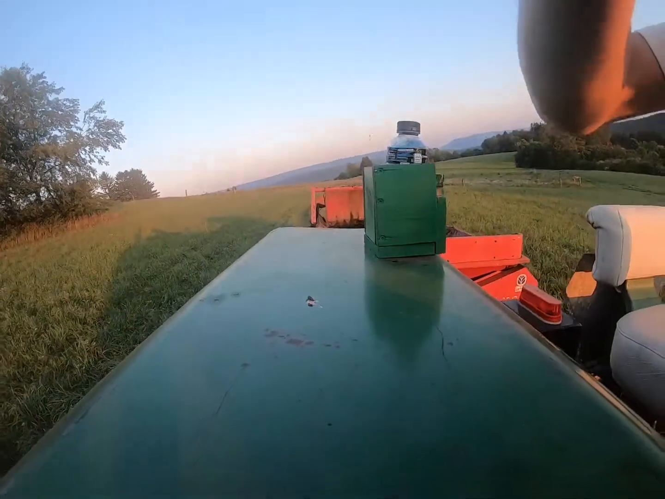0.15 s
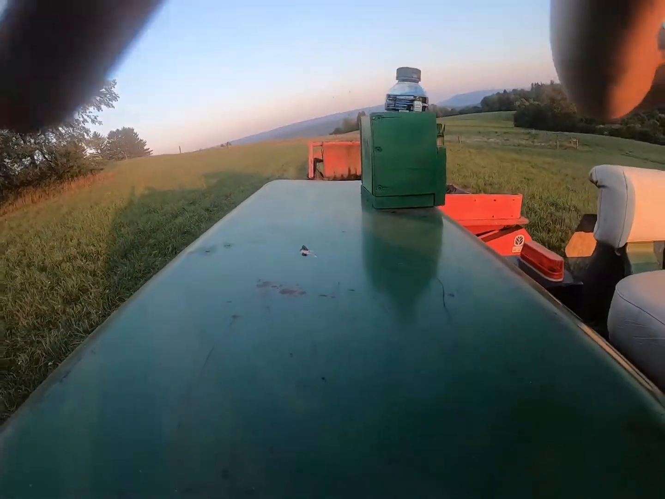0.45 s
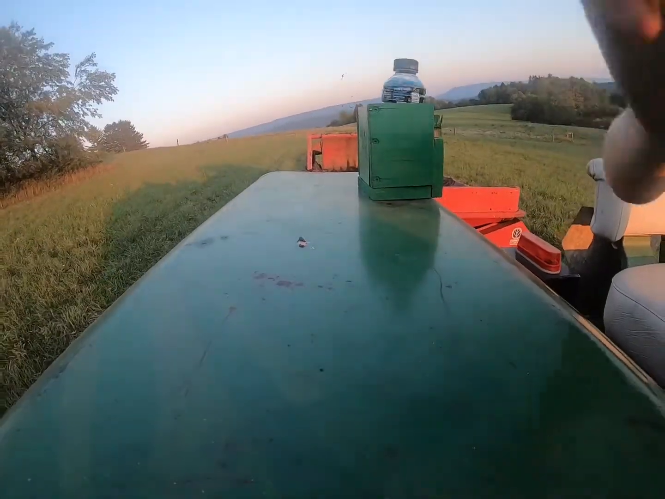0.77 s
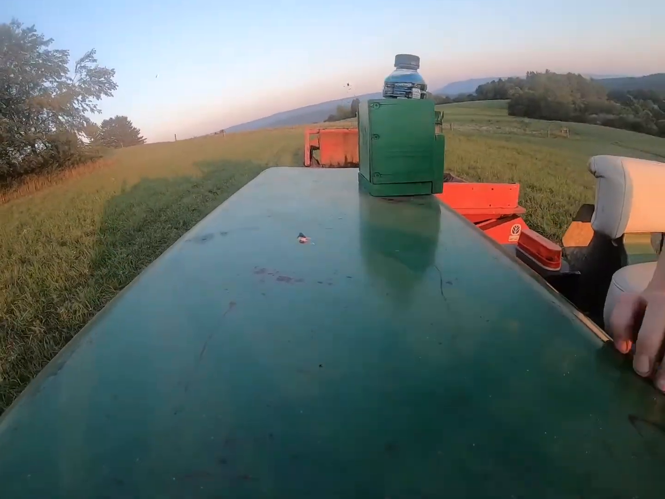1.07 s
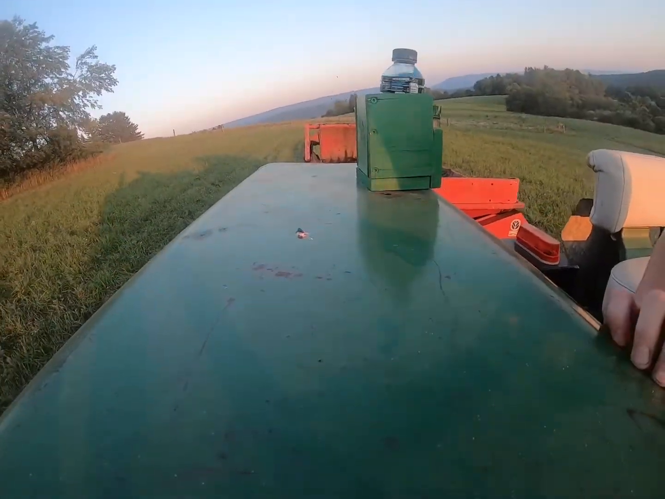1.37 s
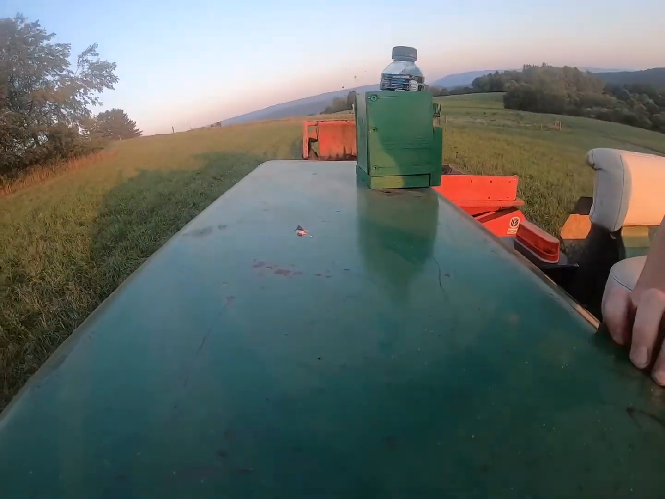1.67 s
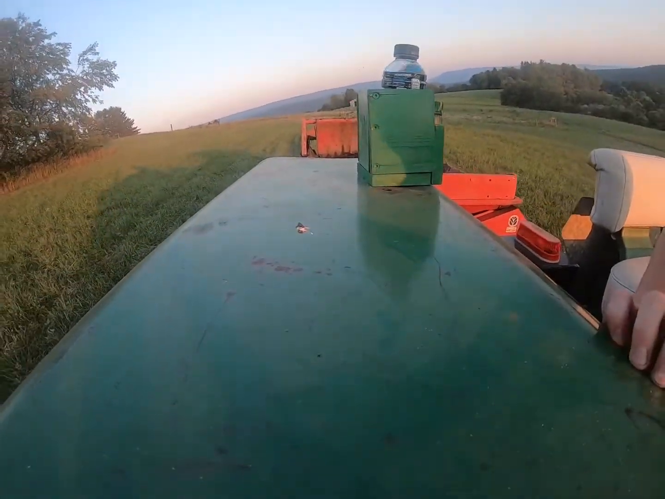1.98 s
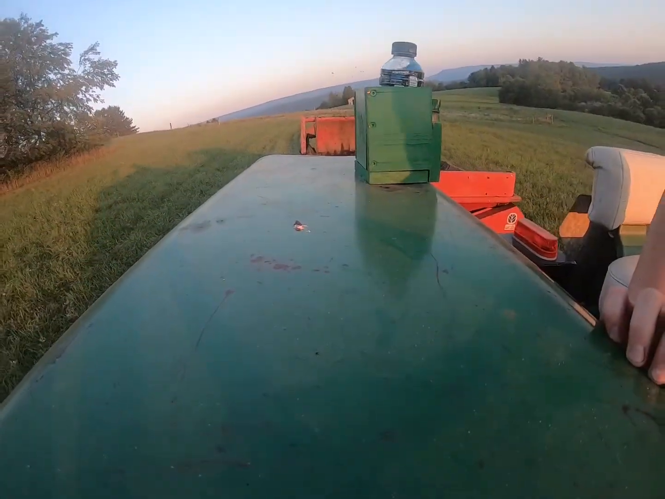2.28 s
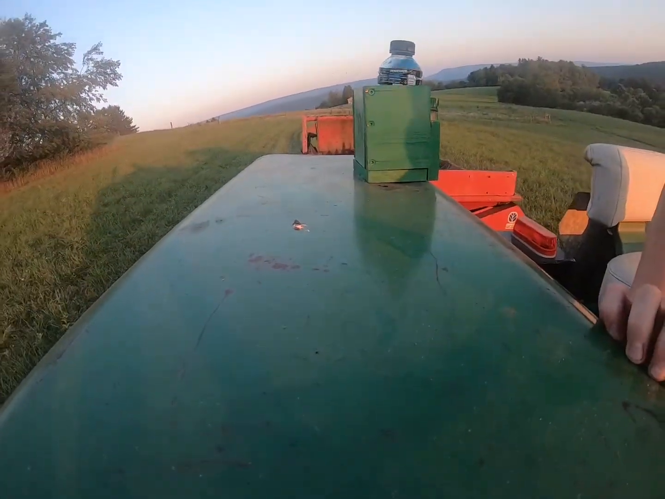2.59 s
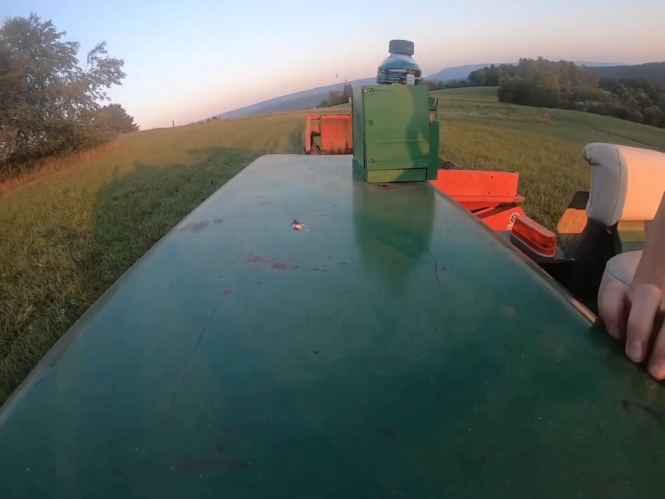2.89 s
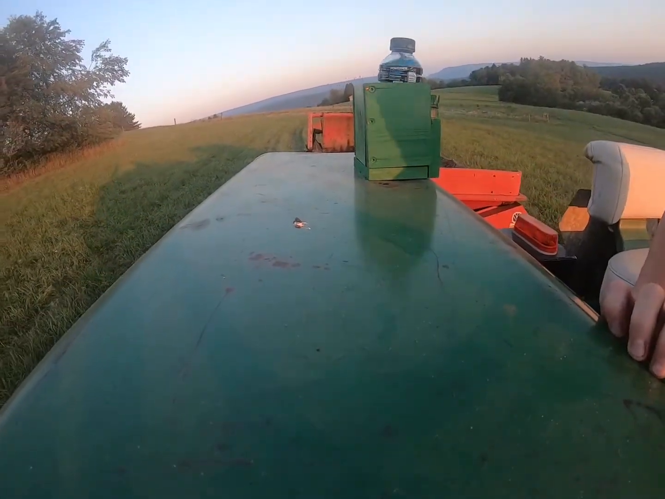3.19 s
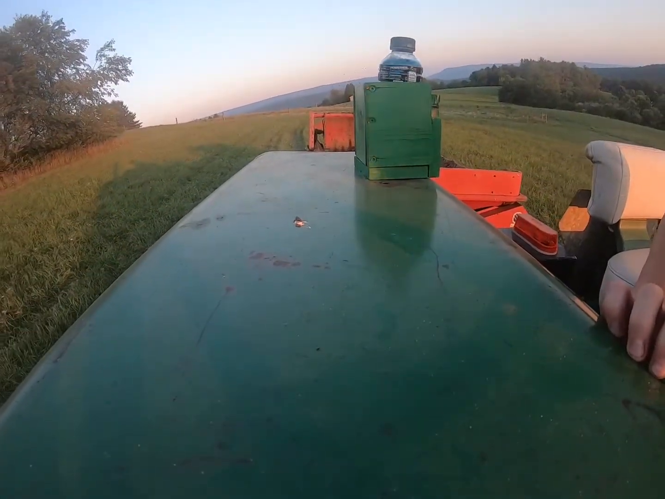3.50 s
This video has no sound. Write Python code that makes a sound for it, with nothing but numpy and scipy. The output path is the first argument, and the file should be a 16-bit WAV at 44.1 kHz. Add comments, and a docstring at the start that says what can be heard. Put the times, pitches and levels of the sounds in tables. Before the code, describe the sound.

A diesel tractor engine drones at steady revs, low booming exhaust with buzzing mechanical roar.

```python
"""Diesel tractor at work

A diesel tractor works a field at steady revs, heard in stereo from its bodywork.
The exhaust booms at the firing rate, block and panels buzz at multiples of the engine cycle, and a fan hums.
Coloured noise makes a broad mechanical roar, brighter on the right, where the engine is.
Extra hiss and a low gust fade out early; two small taps and a brief rasp come within the first second."""
import sys
import numpy as np
from scipy import signal
from scipy.fft import rfft, irfft, next_fast_len
from scipy.io import wavfile

SR = 44100
rng = np.random.default_rng(int(sys.argv[2]) if len(sys.argv) > 2 else 0)


def materialize(psi):
    """Save the field psi as 16-bit PCM at rate SR to the path in sys.argv[1].

    A 1-D psi becomes a single channel; in a 2-D psi each row is a channel.
    """
    bounded = np.clip(np.atleast_2d(psi).T, -1, 1)
    quanta = np.round(bounded * 32767).astype(np.int16)
    wavfile.write(sys.argv[1], SR, quanta)


N = 160965


def from_db(db):
    """Turn decibels into a plain multiplier."""
    return 10 ** (np.asarray(db) / 20)


def rms_one(x):
    """Scale a signal to an RMS of 1."""
    return x / np.sqrt(np.mean(x ** 2) + 1e-20)


def drift(rate_hz):
    """Slow random wandering with spread 1: noise smoothed twice, made once per 64 samples."""
    r = np.exp(-128 * np.pi * rate_hz / SR)
    noise = rng.standard_normal(N // 64 + 1002)
    slow = signal.lfilter([1], [1, -2 * r, r * r], noise)[1000:]  # drop the filter's start-up
    return np.interp(np.arange(N) / 64, np.arange(len(slow)), rms_one(slow - slow.mean()))


def noise_band(low_hz, high_hz):
    """Noise between two pitches, with an RMS of 1."""
    sos = signal.butter(3, [low_hz, high_hz], "band", fs=SR, output="sos")
    return rms_one(signal.sosfilt(sos, rng.standard_normal(N)))


# Engine speed, one cycle being two crank turns: (time [s], cycle rate [Hz])
CYCLE_RATE = [(0, 13.18), (.1, 13.17), (.35, 13.29), (.68, 13.115), (.95, 13.235), (1.15, 13.185),
              (1.35, 13.245), (1.9, 13.28), (2.2, 13.23), (2.6, 13.265), (2.73, 13.3), (3.0, 13.185),
              (3.1, 13.19), (3.4, 13.24), (3.65, 13.215)]
START_PLACE = .962  # place in the cycle at the start, 0-1


def cycle_angle():
    """Add up the changing cycle rate into an angle [rad] that turns once per engine cycle."""
    rate_hz = np.interp(np.arange(N) / SR, *np.transpose(CYCLE_RATE))
    return 2 * np.pi * (START_PLACE + np.cumsum(rate_hz) / SR)


# How far the left side runs ahead of the right: (frequency [Hz], lead [rad])
LEFT_LEAD = [(0, 0), (690, 0.17), (1290, -4.5), (2150, -5), (3270, -5), (4050, -5), (5250, -9),
             (6980, -10.5), (8610, -8.5), (9390, -7.5), (10800, -12), (13000, -10.5), (13900, -15),
             (14600, -16)]


def left_lead(hz):
    """Phase lead of the left side at the given frequencies."""
    return np.interp(hz, *np.transpose(LEFT_LEAD))


# Tones locked to the cycle, order 6 being the firing rate; the gains below come on top:
# (order [tones per cycle], left level [dB], right level [dB])
ORDER_LEVELS = [(3, -46.0, -48.0), (4, -45.0, -45.0), (5, -44.0, -45.0), (6, -14.0, -14.0),
                (7, -48.0, -47.0), (8, -37.0, -36.0), (9, -32.0, -32.0), (10, -40.0, -35.0),
                (11, -51.0, -53.0), (12, -37.0, -33.0), (13, -46.0, -47.0), (14, -45.0, -42.0),
                (15, -46.0, -46.0), (16, -49.0, -47.0), (17, -42.0, -43.0), (18, -40.0, -40.0),
                (19, -49.0, -49.0), (21, -51.0, -51.0), (22, -46.0, -46.0), (23, -51.0, -51.0),
                (24, -47.0, -46.0), (25, -47.0, -46.0), (26, -42.0, -42.0), (27, -41.0, -41.0),
                (28, -36.0, -36.0), (29, -50.0, -55.0), (30, -48.0, -47.0), (31, -41.0, -41.0),
                (32, -38.0, -37.0), (33, -56.0, -45.0), (34, -42.0, -41.0), (35, -49.0, -47.0),
                (36, -47.0, -46.0), (38, -52.0, -52.0), (39, -46.0, -44.0), (40, -51.0, -51.0),
                (41, -44.0, -43.0), (42, -51.0, -49.0), (43, -48.0, -45.0), (44, -46.0, -44.0),
                (46, -49.0, -48.0), (48, -49.0, -50.0), (49, -54.0, -49.0), (50, -48.0, -44.0),
                (52, -47.0, -46.0), (54, -52.0, -46.0), (55, -57.0, -53.0), (56, -54.0, -46.0),
                (57, -50.0, -43.0), (58, -52.0, -47.0), (59, -52.0, -48.0), (60, -57.0, -45.0),
                (61, -67.0, -51.0), (63, -57.0, -50.0), (64, -56.0, -48.0), (65, -64.0, -52.0),
                (66, -43.0, -39.0), (67, -54.0, -50.0), (68, -66.0, -43.0), (69, -56.0, -44.0),
                (70, -57.0, -37.0), (71, -48.0, -34.0), (72, -53.0, -40.0), (73, -56.0, -38.0),
                (74, -59.0, -46.0), (75, -51.0, -35.0), (76, -44.0, -42.0), (77, -65.0, -37.0),
                (78, -51.0, -34.0), (79, -56.0, -38.0), (80, -50.0, -41.0), (81, -70.0, -43.0),
                (83, -65.0, -42.0), (84, -54.0, -54.0), (85, -66.0, -42.0), (86, -49.0, -54.0),
                (88, -51.0, -42.0), (89, -56.0, -46.0), (90, -57.0, -40.0), (91, -59.0, -52.0),
                (92, -57.0, -42.0), (93, -51.0, -43.0), (94, -50.0, -40.0), (95, -57.0, -51.0),
                (96, -52.0, -45.0), (97, -52.0, -39.0), (98, -49.0, -44.0), (99, -52.0, -47.0),
                (100, -38.0, -33.0), (101, -52.0, -52.0), (102, -54.0, -54.0), (104, -55.0, -43.0),
                (105, -59.0, -43.0), (106, -55.0, -47.0), (107, -57.0, -44.0), (108, -55.0, -46.0),
                (110, -56.0, -45.0), (111, -60.0, -50.0), (115, -61.0, -49.0), (117, -59.0, -44.0),
                (119, -58.0, -43.0), (120, -49.0, -41.0), (121, -56.0, -47.0), (122, -60.0, -50.0),
                (126, -61.0, -51.0), (130, -56.0, -50.0), (131, -63.0, -51.0), (132, -52.0, -41.0),
                (138, -66.0, -50.0), (142, -57.0, -45.0), (145, -60.0, -52.0), (146, -58.0, -50.0),
                (151, -71.0, -51.0), (152, -63.0, -50.0), (154, -60.0, -49.0), (158, -63.0, -51.0),
                (159, -68.0, -50.0), (160, -52.0, -45.0), (166, -57.0, -47.0), (168, -58.0, -52.0),
                (176, -64.0, -52.0), (180, -62.0, -51.0), (182, -61.0, -49.0), (188, -63.0, -52.0),
                (191, -68.0, -54.0), (192, -73.0, -50.0), (198, -72.0, -49.0), (200, -68.0, -52.0),
                (204, -65.0, -51.0), (208, -60.0, -54.0), (210, -71.0, -50.0), (211, -73.0, -55.0),
                (218, -62.0, -54.0), (220, -59.0, -57.0), (222, -67.0, -56.0), (224, -59.0, -58.0),
                (236, -68.0, -57.0), (246, -68.0, -58.0), (250, -61.0, -55.0), (256, -73.0, -60.0)]
# Combustion chatter on the orders between those: (order [tones per cycle], right level before gain [dB])
CHATTER_LEVELS = [(60, -54), (110, -56), (180, -58), (220, -63), (260, -68)]
CHATTER_LEFT_DB = -6  # left compared with right
# Rings of block and panels: (orders below this [order], centre [order], half width [orders])
RING_RANGES = [(21, 12, 99), (50, 30, 3.5), (88, 75, 5), (110, 98, 5), (300, 155, 12)]
# Firings and valve blows, one list per ring, each blow once a cycle: (place in cycle [0-1], level [dB])
RING_BLOWS = [
    [(.022, -3), (.12, -3), (.22, -2), (.305, -6), (.4, -7), (.555, -1), (.66, -8), (.79, 0), (.9, 0)],
    [(.02, -4), (.09, -6), (.2, -5), (.335, 0), (.41, -4), (.53, -6), (.6, -6), (.7, -8), (.9, -7)],
    [(.022, 0), (.09, -4), (.14, -5), (.19, -6), (.34, -6), (.41, -5), (.535, -2), (.665, -2), (.705, -5),
     (.76, -6), (.81, -7), (.92, -7)],
    [(.02, -5), (.115, -3), (.245, -7), (.36, -6), (.42, 0), (.53, -6), (.61, -1), (.72, -4), (.78, -4),
     (.915, -2)],
    [(0, -4), (.1, -2), (.145, 0), (.255, -2), (.31, -5), (.45, -2), (.56, -4), (.62, -4), (.78, -5),
     (.85, -5), (.945, -4)],
]
FIRING_ORDER, BOOM_PLACE, KNOCK_ORDER = 6, .008, 60  # knocks are the orders from 60 up
BOOM_GAIN_DB, THUMP_GAIN_DB, KNOCK_GAIN_DB = .43, .2, .1
KNOCK_SCATTER = .3  # random phase between the sides [rad]
WAVER, WAVER_HZ, WAVER_FULL_ORDER = .2, 6.4, 85  # high orders waver in level, low ones hold nearly still


def order_phase(order):
    """Phase that makes neighbouring orders bunch into rings starting at the blows."""
    if order == FIRING_ORDER:
        return -2 * np.pi * order * BOOM_PLACE
    ring = sum(order >= top for top, _, _ in RING_RANGES)
    _, centre, half_width = RING_RANGES[ring]
    place, blow_db = np.transpose(RING_BLOWS[ring])
    blows = np.sum(from_db(blow_db) * np.exp(-2j * np.pi * order * place))
    return np.angle(blows) - np.arctan((order - centre) / half_width)  # a resonance lags as pitch rises


def engine_tones(angle):
    """Firing boom, block buzz and chatter: one sine per order of the engine cycle."""
    out, angle = 0, angle[::4]  # a quarter of the sample rate is enough
    wavers = [drift(WAVER_HZ)[::4] for _ in range(16)]
    tones = list(ORDER_LEVELS)
    listed = [row[0] for row in ORDER_LEVELS]
    for order in range(60, 260):
        if order not in listed:
            right_db = np.interp(order, *np.transpose(CHATTER_LEVELS))
            tones.append((order, right_db + CHATTER_LEFT_DB, right_db))
    for order, left_db, right_db in tones:
        lead = left_lead(order * CYCLE_RATE[0][1])
        if order >= KNOCK_ORDER:
            gain_db = KNOCK_GAIN_DB
            lead = lead + KNOCK_SCATTER * rng.standard_normal()
        elif order > FIRING_ORDER:
            gain_db = THUMP_GAIN_DB
        else:
            gain_db = BOOM_GAIN_DB * (order == FIRING_ORDER)
        depth = WAVER * min(order / WAVER_FULL_ORDER, 1)
        waver = np.maximum(1 + depth * wavers[round(order) % 16], 0)
        tone = np.cos(order * angle + order_phase(order) + [[lead], [0]])
        out = out + from_db(gain_db + np.array([[left_db], [right_db]])) * waver * tone
    return np.sqrt(2) * signal.resample_poly(out, 4, 1, axis=1, padtype="line")[:, :N]


# Belt-driven fan, the gain below comes on top: (blade order [tones per cycle], level [dB])
FAN_TONES = [(14.75, -37), (29.5, -45)]
FAN_GAIN_DB, FAN_WAVER_DB = .5, 1


def fan(angle):
    """Blade tone and its octave, both turning with the engine and unsteady in level."""
    out = 0
    for order, db in FAN_TONES:
        level_db = db + FAN_GAIN_DB + FAN_WAVER_DB * drift(2.2)
        out = out + np.sqrt(2) * from_db(level_db) * np.cos(order * angle)
    return out


# Roar of air, gears and panels, before the shift ROAR_DB:
# (frequency [Hz], left level [dB in 1 Hz], right level [dB in 1 Hz])
ROAR_COLOUR = [(22, -19, -18), (44.7, -11.5, -19), (92, -7, -23.5), (135, -5.5, -3.5), (164, -15, -6.5),
               (198, -5.5, -1.5), (279, -11.5, -14), (415, -12.5, -7), (510, -10, -8.5),
               (663, -19.5, -12.5), (1020, -19, -6), (1240, -15.5, -9.5), (1610, -29, -13.5),
               (1930, -22, -14.5), (2140, -31, -16), (2570, -27.5, -18), (2920, -28.5, -19),
               (3400, -28.5, -22), (4030, -34, -25.5), (4730, -34, -27.5), (5440, -32, -26.5),
               (6960, -34, -26.5), (8840, -36, -28), (10280, -33.5, -33.5), (10930, -53, -53),
               (12200, -50.5, -48.5), (14000, -45.5, -46)]
# Ringing panels that lift the roar: (frequency [Hz], width [Hz], lift [dB])
PANEL_LIFTS = [(986, 74, 2.5), (1296, 150, 3), (1575, 70, 4), (2140, 90, 5.5), (2830, 140, 5),
               (4380, 90, 4), (4790, 90, 7)]
# How much of the left side's noise is the right side's: (frequency [Hz], share [0-1])
SHARED_NOISE = [(60, 0.94), (300, 0.86), (600, 0.83), (1200, 0), (3000, 0.85), (5500, 0.44), (8000, 0.33),
                (14000, .5)]
ROAR_DB, ROAR_PATCHY_DB = -46.5, .92
FIRING_GATE_DB, CYCLE_GATE_DB, GATE_RAD = .9, .5, .86  # treble pulses with each firing and each cycle
CHUG_DB, CHUG_RAD = .4, .4  # the middle chugs on every second firing


def roar(angle):
    """Coloured noise in flickering octave bands, pulsing with the engine."""
    size = next_fast_len(N)
    hz = np.maximum(np.arange(size // 2 + 1) * SR / size, 1)
    panels_db = 0
    for centre_hz, width_hz, db in PANEL_LIFTS:
        panels_db = panels_db + db / (1 + (2 * (hz - centre_hz) / width_hz) ** 2)
    colour_hz, left_db, right_db = np.transpose(ROAR_COLOUR)
    sides_db = np.array([np.interp(np.log(hz), np.log(colour_hz), db) for db in (left_db, right_db)])
    colour = from_db(ROAR_DB + panels_db + sides_db)

    share_hz, share = np.transpose(SHARED_NOISE)
    share = np.clip(np.interp(np.log(hz), np.log(share_hz), share), 0, 1)
    common, own = rfft(rng.standard_normal((2, size))) * np.sqrt(SR / 2)  # power 1 in each 1 Hz
    left = share * common * np.exp(1j * left_lead(hz)) + np.sqrt(1 - share ** 2) * own
    spectrum = colour * np.array([left, common]) * (hz > 8)

    gate_db = FIRING_GATE_DB * np.cos(6 * (angle - GATE_RAD)) + CYCLE_GATE_DB * np.cos(angle - GATE_RAD)
    chug_db = CHUG_DB * np.cos(3 * (angle - CHUG_RAD))
    out, together = 0, drift(1.9)
    for k in range(11):
        octave = np.clip(1 - abs(np.log2(hz / 16) - k), 0, 1)  # overlapping bands, centred on 16 Hz * 2^k
        flicker_db = ROAR_PATCHY_DB * (drift(19.0) + .46 * together) * np.clip((k - 2.5) / 4, .2, 1)
        wobble_db = flicker_db + gate_db * np.clip((k - 6) / 2, 0, 1) + chug_db * (4 < k < 8)
        out = out + rms_one(from_db(wobble_db)) * irfft(spectrum * octave, size)[:, :N]
    return out


# Extra hiss, full from the start until it fades:
# (side [0 left, 1 right], low edge [Hz], high edge [Hz], level [dB], fade start [s], fade length [s])
HISS_BANDS = [(0, 1360, 2450, -28.5, 0.58, .16), (0, 2330, 3400, -41.5, 0.72, 0.14),
              (0, 3400, 5560, -39, 0.87, 0.069), (0, 6000, 10050, -45, 0.76, 0.33),
              (1, 5880, 7620, -34.5, 0.31, 0.19), (1, 3600, 5860, -37, 0.2, .15),
              (1, 1750, 2430, -32.5, 0.73, 0.06)]


def opening_hiss():
    """Flickering bands of noise that brighten the opening, then fade out."""
    out, t = np.zeros((2, N)), np.arange(N) / SR
    for side, low_hz, high_hz, db, start_s, fade_s in HISS_BANDS:
        fade = np.clip(1 - (t - start_s) / fade_s, 0, 1)
        out[round(side)] += from_db(db + 1.7 * drift(13.0)) * fade * noise_band(low_hz, high_hz)
    return out


def wind_gust():
    """Low noise of wind at the microphone openings, 12 dB weaker on the left, fading from 0.4 to 0.5 s."""
    fade = np.clip((.4 - np.arange(N) / SR) / .1 + 1, 0, 1)
    return from_db([[-45], [-33]]) * noise_band(9.8, 45) * fade


# Small taps on the plastic housing near the left microphone, level before the soft onset and the decay:
# (time [s], level [dB], pitch [Hz], time to fall 60 dB [s])
HOUSING_TAPS = [(.308, -5, 1200, .016), (.584, -14, 1320, .04)]
TAP_RIGHT_DB = -14  # right compared with left


def taps():
    """Short damped sine rings of the housing."""
    out, t = np.zeros(N), np.arange(N) / SR
    for start_s, db, pitch_hz, t60_s in HOUSING_TAPS:
        age = np.maximum(t - start_s, 0)
        onset = np.minimum(age / .0026, 1)
        out += from_db(db - 60 * age / t60_s) * np.sin(2 * np.pi * pitch_hz * age) * onset
    return from_db([[0], [TAP_RIGHT_DB]]) * out


# A brief brighter rasp on the right: (low edge [Hz], high edge [Hz], level [dB], start [s], end [s])
RASP_BAND = (3002.5, 5003, -36, .58, 0.67)


def rasp():
    """A band of noise that swells and dies away on the right."""
    out, t = np.zeros((2, N)), np.arange(N) / SR
    low_hz, high_hz, db, start_s, end_s = RASP_BAND
    swell = np.clip(np.minimum(t - start_s, end_s - t) / .065, 0, 1)
    out[1] = from_db(db) * swell * noise_band(low_hz, high_hz)
    return out


def scene():
    """Add all the sounds, the engine-driven ones sharing one cycle angle."""
    angle = cycle_angle()
    engine = engine_tones(angle) + fan(angle) + roar(angle)
    return engine + opening_hiss() + wind_gust() + taps() + rasp()


TOP = 1.15  # height that rounded peaks approach
OFFSET, CUTOFF_HZ = .004, 15000


def record(dry):
    """The input stage rounds the peaks, the highest treble is cut and a small constant offset is added."""
    rounded = TOP * np.tanh(dry / TOP)
    treble_cut = signal.cheby2(12, 70, CUTOFF_HZ, fs=SR, output="sos")
    return OFFSET + signal.sosfilt(treble_cut, rounded)


dry = scene()
out = record(dry)
materialize(out)
```